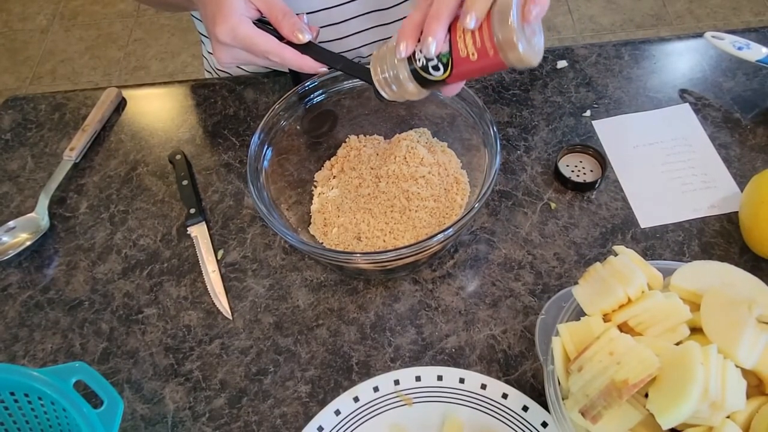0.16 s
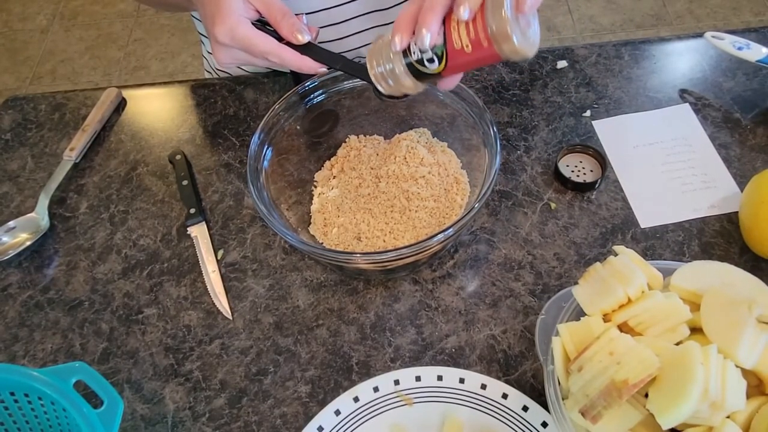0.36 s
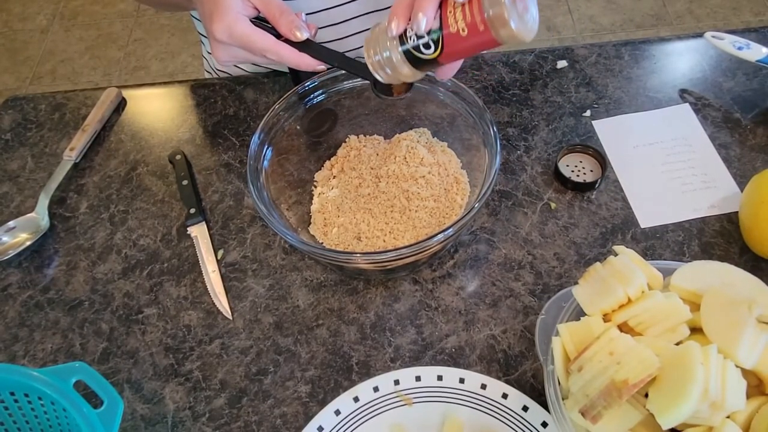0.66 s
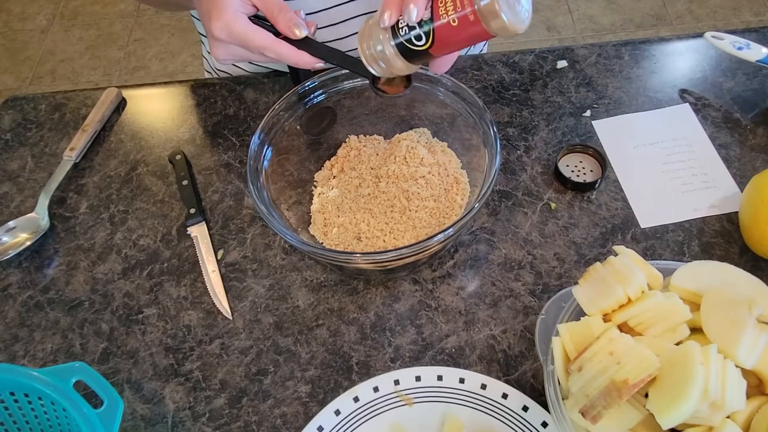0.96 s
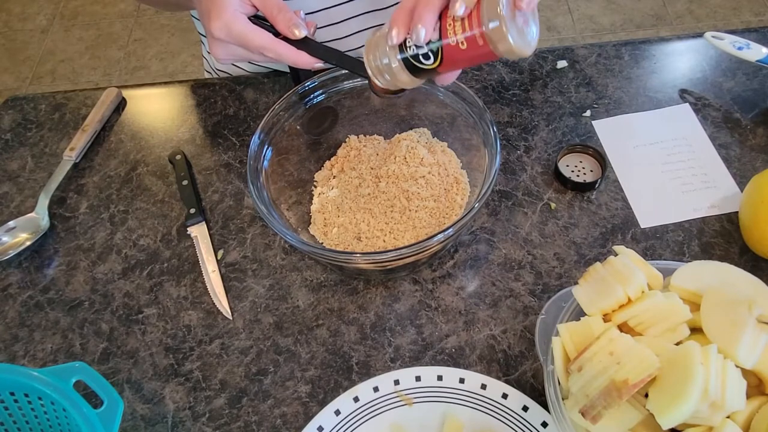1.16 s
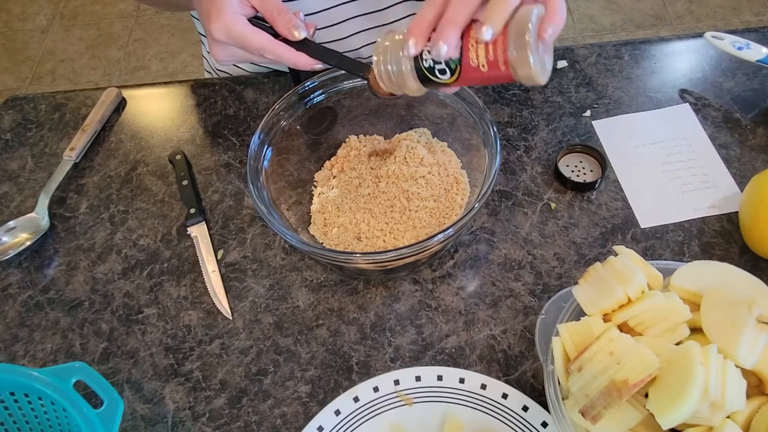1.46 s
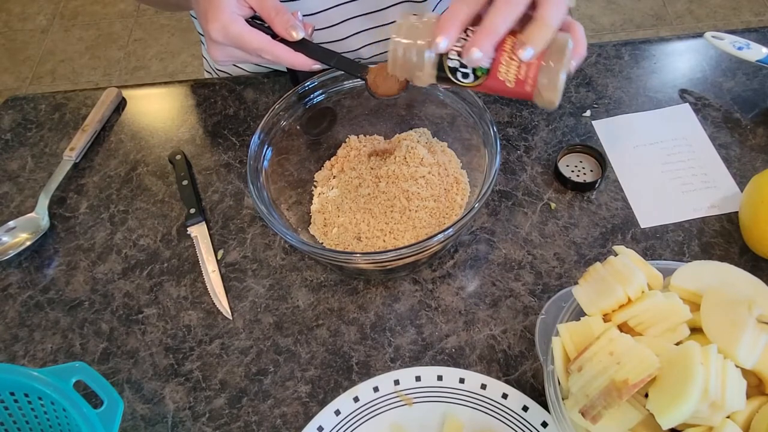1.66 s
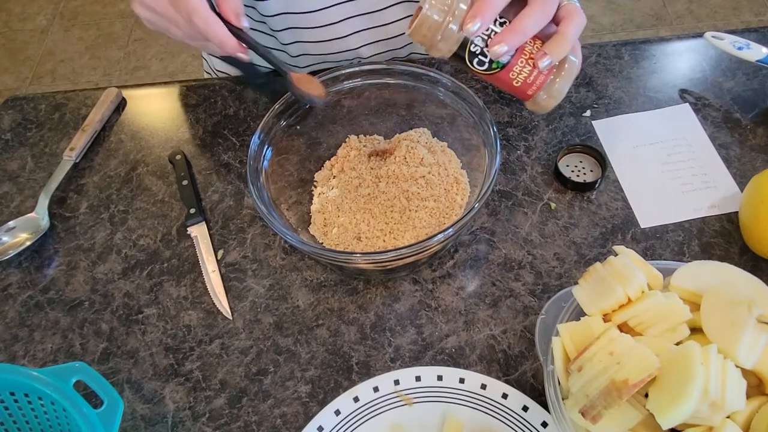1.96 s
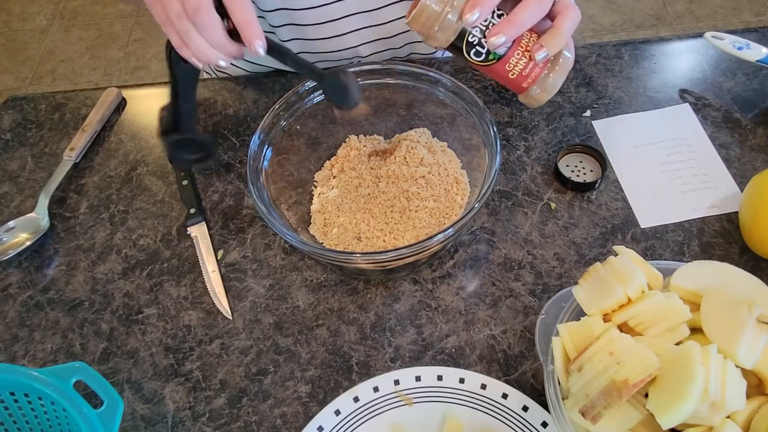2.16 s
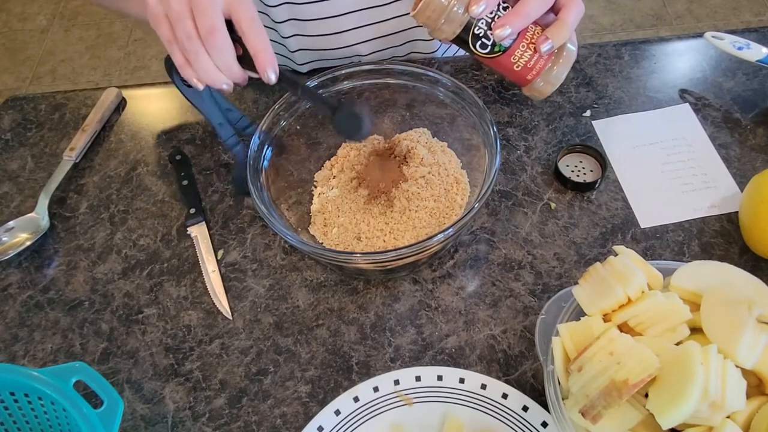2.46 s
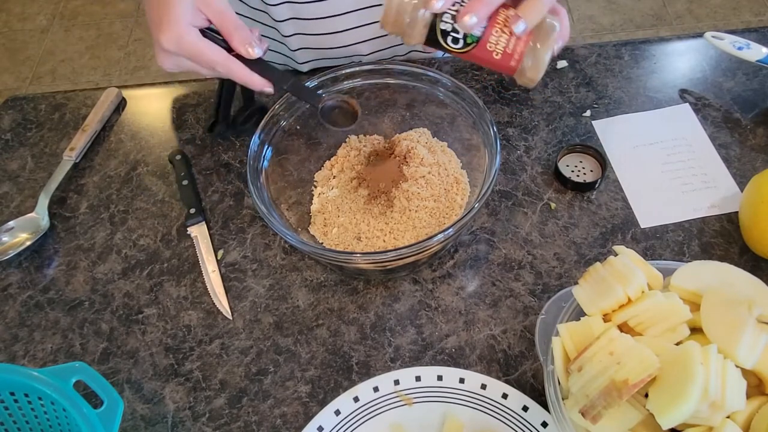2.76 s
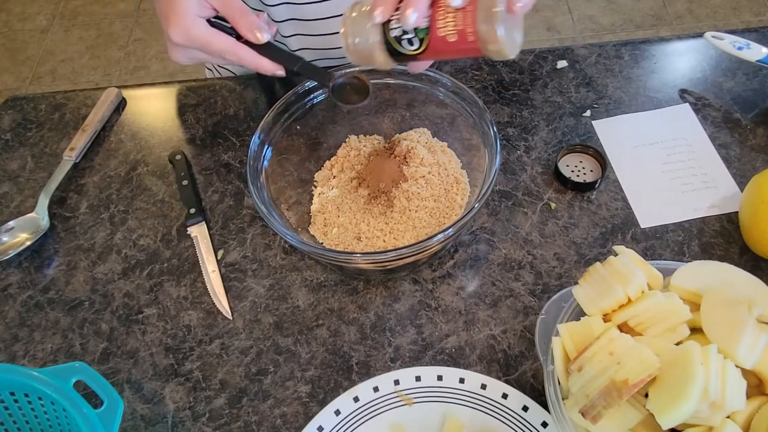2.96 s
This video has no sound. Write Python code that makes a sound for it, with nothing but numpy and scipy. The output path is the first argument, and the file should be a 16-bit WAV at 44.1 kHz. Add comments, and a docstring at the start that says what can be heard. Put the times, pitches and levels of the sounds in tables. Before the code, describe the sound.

Small hollow spoon taps on a spice jar come first, then near quiet, a sharp plastic click, one hard glass bowl clink with a short ring, and faint rattles; close pickup, low refrigerator hum.

```python
"""A plastic measuring spoon taps and scrapes in the neck of a spice jar, close to a pair of microphones.
Soft contacts ring short jar modes and the air inside; its fellow spoons click on their ring as runs of slips.
One spoon strikes a glass bowl on a stone counter: a knock, a crack, dull thumps and long dying glass modes.
The quiet kitchen adds early echoes and a scattered tail, over shaped-noise room tone and the wavering
lines of a humming refrigerator."""
import sys
import numpy as np
from scipy import signal
from scipy.fft import rfft, irfft
from scipy.io import wavfile
from scipy.ndimage import uniform_filter1d

SR = 44100
rng = np.random.default_rng(int(sys.argv[2]) if len(sys.argv) > 2 else 0)


def store_wav(level_fs):
    """Save 16-bit WAV to argv[1]."""
    pcm = np.round(np.clip(np.atleast_2d(level_fs), -1, 1) * 32767)
    wavfile.write(sys.argv[1], SR, pcm.T.astype(np.int16))


N = 136710  # samples

# Room tone spectrum: (frequency [Hz], relative density [dB per Hz])
AIR_SPECTRUM = [(25, -29), (45, -19), (60, -11.5), (110, -17), (150, -28), (240, -14), (280, -17),
                (330, -14), (480, -21), (560, -22), (700, -17), (960, -29.5), (1300, -26.5), (2300, -35.5),
                (3000, -31.5), (5000, -39.5), (6800, -35.5), (8200, -46), (9200, -38), (11000, -54.5),
                (14000, -42), (16000, -54.5)]
# Likeness of the two microphones: (frequency [Hz], left-right correlation [-1 to 1])
MIC_LIKENESS = [(60, 0.89), (130, 0.74), (290, 0.67), (640, -0.049), (1410, -0.46), (3100, -0.037),
                (6820, -0.005), (15000, 0.074)]
# Tilt of the background between microphones: (frequency [Hz], left minus right [dB])
BACKGROUND_LEAN = [(80, 7), (200, -1.5), (700, 4), (1500, -0.5), (4400, 2), (9000, -2)]
AIR_RMS_DB, PATCH_DB = -68.5, 1.04

# Refrigerator lines: (frequency [Hz]), one for each row of HUM_LINES
HUM_HZ = [59.5, 237, 251, 306, 474, 667.6, 1305, 3677, 6880]
# Refrigerator lines: (level before the left-right lean [dB rms], width of the wavering part [Hz])
HUM_LINES = [(-76, 0.78), (-79.5, 5.7), (-82.5, 2.3), (-78, 2.9), (-85, 2.5), (-75.5, 4.3), (-88, 14),
             (-99, 25), (-98.5, 33)]
HUM_STEADY = 0.85  # amplitude share of the steady part

# Spoon on the jar neck: (time [s], level [dB], air note [Hz], air note level [dB],
# upper mode level [dB], treble slope [dB per octave])
JAR_TAPS = [(0.1222, -40, 926, -6, -12, -9), (0.2669, -30.5, 1110, -23, -2.5, 2.5),
            (0.464, -43, 936, -4, -1.5, -6.5), (0.6365, -39.5, 1290, -6.5, -8.5, 5),
            (0.8018, -41.5, 823, -7, -1.5, -12), (0.9605, -34.5, 1237, -9, -13.5, -13)]
# Modes of the jar: (frequency [Hz], level [dB])
JAR_MODES = [(580, -12.5), (1790, -1.5), (2700, 1.5), (3200, 7), (4050, -0.5), (5250, 1.5), (7000, -7)]
# Spoon rubbing along the neck: (start [s], length [s], level [dB], upper mode level [dB])
JAR_RUBS = [(0.272, 0.066, -52.5, -11.5)]
# Upper modes lie above the middle; the treble slope starts at the high frequency
JAR_MID_HZ, JAR_HIGH_HZ = 1790, 3300
JAR_SPREAD, JAR_SPREAD_DB = .04, 2.5  # chance in mode pitch (as a share) and in mode level
JAR_T60_S, JAR_RISE_S = .014, .0008
CONTACT_SAMPLES = 7
TICK_DB, TICK_T60_S = -7.5, 0.0065
RUB_SLIPS_PER_S, RUB_RISE, RUB_GRIT = 830, 0.62, 0.054  # rise: share of the length
RUB_AIR_HZ, RUB_AIR_DB = 1040, -16

# Loose spoons clicking and brushing: (time [s], length [s], level [dB], pitch [Hz], half width [Hz])
SPOON_CLICKS = [(1.37, 0.074, -71, 2400, 470), (2.333, 0.000071, -20, 3880, 248),
                (2.3306, 0.00028, -31.5, 6370, 403), (2.3752, 0.00012, -33, 3900, 295),
                (2.337, 0.12, -59.5, 4050, 310), (2.873, 0.003, -53, 6200, 920),
                (2.8977, 0.000079, -35.5, 3500, 1196), (2.9, 0.03, -61.5, 2550, 410),
                (2.912, 0.15, -65.5, 3640, 590), (2.959, 0.026, -59.5, 6000, 500),
                (2.9675, 0.00011, -35, 5850, 603), (2.979, 0.000089, -34, 5800, 510),
                (2.967, 0.061, -63, 5780, 510)]
CLICK_RISE = 0.053  # share of the length

# Thumps through the counter: (time [s], starting level [dB], frequency [Hz], t60 [s])
COUNTER_THUMPS = [(2.356, -53.5, 92, 0.11), (2.559, -52.5, 189.6, 0.16)]
# The striking spoon: (frequency [Hz], level [dB], t60 [s])
SPOON_MODES = [(2686, -15, 0.0068), (2015, -27.5, 0.0099), (6010, -37, 0.066)]
# Spectrum of the crack: (frequency [Hz], relative level [dB])
CRACK_SPECTRUM = [(100, -23.5), (250, -7), (700, -14.5), (1500, -13.5), (2600, -10.5), (5500, -13.5),
                  (9000, -20.5), (16000, -30)]
CRACK_DB, CRACK_T60_S = -25.5, 0.033
STRIKE_S, STRIKE_RISE_S = 2.5584, 0.00073

# Glass bowl modes: (frequency [Hz]), one for each row of BOWL_MODES
BOWL_HZ = [571, 583, 1335, 1336, 2355, 2356, 3620, 5158, 6908, 7918, 8875, 10000]
# Glass bowl modes: (level [dB], t60 [s], left minus right [dB], left phase lead [radians])
BOWL_MODES = [(-40, .36, 2, -1), (-44, .55, 2, 0), (-33, .36, 9, 2.2), (-39, .66, -8, 2.3),
              (-29, .27, 8, .2), (-44, .5, 3, .2), (-52, .13, 2, 1), (-42, .34, 4, .5), (-51, .15, 0, 1),
              (-52, .18, 2, 1), (-52, .15, -2, -1), (-60, .15, 0, 1)]
BOWL_SWELL_S = 0.00077

# First echoes: (delay [s], left level [dB], right level [dB])
EARLY_ECHOES = [(.0011, -4, -3), (.0056, -9, -9), (.0088, -20, -18)]
LEFT_DB, RIGHT_DB, RIGHT_LAG_S = 1.5, -1.5, .0001  # direct sound
# Dying of the kitchen tail: (frequency [Hz], t60 [s])
KITCHEN_T60 = [(150, 0.34), (500, 0.37), (1500, 0.5), (4000, 0.32), (8000, 0.37), (14000, 0.08)]
TAIL_START_S, TAIL_TURNS_PER_S = .004, 2.3
JAR_WET_DB, STRIKE_WET_DB, BOWL_WET_DB = -11, 1.5, -13  # sent to the tail

MIC_LOW_HZ, MIC_HIGH_HZ = 44.7, 16100


def amp(db):
    """Decibels to amplitude."""
    return 10 ** (np.asarray(db) / 20)


def evened(x):
    """The sound brought to an rms of one."""
    return x / np.sqrt(np.mean(x ** 2) + 1e-20)


def read(points, hz):
    """A table value at any frequency, drawn straight between points on a log frequency scale."""
    f, value = np.transpose(points)
    return np.interp(np.log(hz + 1), np.log(f + 1), value)


def add(mix, s, sound):
    """Lay a sound into the mix from time s, cut at the end of the mix."""
    part = mix[..., round(s * SR):][..., :sound.shape[-1]]
    part += sound[..., :part.shape[-1]]


def ring(modes, seconds):
    """Sum of dying sines, one for each (Hz, dB, t60)."""
    t = np.arange(0, seconds, 1 / SR)
    return sum(amp(db - 60 * t / t60) * np.sin(2 * np.pi * hz * t) for hz, db, t60 in modes)


def slips(s, length, rise, size):
    """A short run of uneven contacts that swells and dies away; rise is a share of the length."""
    length = max(length, .0001)
    u = np.arange(0, length, 1 / SR) / length
    contacts = evened(size[round(s * SR):][:len(u)])
    return contacts * np.minimum(u / rise, 1) * (1 - u)


def room_tone():
    """Steady stereo noise with faint drifting patches, partly alike at the two microphones."""
    frames, hz = N // 512 + 5, np.fft.rfftfreq(2048, 1 / SR)
    a, b, c, d, patches = rng.standard_normal((frames, 1025, 5)).T
    # smoothed over neighbouring frequencies and frames
    patches = evened(uniform_filter1d(uniform_filter1d(patches, 14, 0), 10, 1))
    same = np.clip(read(MIC_LIKENESS, hz), -1, 1)[:, None]
    left = a + 1j * b
    right = same * left + np.sqrt(1 - same ** 2) * (c + 1j * d)
    lean_db = np.array([.5, -.5])[:, None, None] * read(BACKGROUND_LEAN, hz)[:, None]
    level_db = read(AIR_SPECTRUM, hz)[:, None] + lean_db + PATCH_DB * patches
    spectrum = np.array([left, right]) * amp(level_db)
    noise = signal.istft(spectrum, nperseg=2048, noverlap=1536)[1][:, :N]
    return amp(AIR_RMS_DB) * evened(noise)


def refrigerator():
    """Motor lines, part steady and part wavering, phased apart by the microphones' likeness."""
    t, out = np.arange(N) / SR, np.zeros((2, N))
    for hz, (db, width_hz) in zip(HUM_HZ, HUM_LINES):
        # wavering: complex noise through a one-pole lowpass
        r = np.exp(-np.pi * width_hz / SR)
        noise = rng.standard_normal((2, N, 2)) @ [1, 1j]
        waver = signal.lfilter([1], [1, -r], noise) * np.sqrt((1 - r * r) / 2)
        motion = HUM_STEADY + np.sqrt(1 - HUM_STEADY ** 2) * waver
        lead = np.arccos(np.clip(read(MIC_LIKENESS, hz), -1, 1))  # the right leads
        turn = np.exp(2j * np.pi * hz * t + 1j * lead * np.array([[0], [1]]))
        lean = amp(np.array([[.5], [-.5]]) * read(BACKGROUND_LEAN, hz))
        out += amp(db) * np.sqrt(2) * lean * (motion * turn).real
    return out


def jar(air_hz, air_db, upper_db, tilt_db, chance):
    """The jar's short ring and the note of the air inside it; high modes die sooner."""
    modes = [(air_hz, air_db, JAR_T60_S)]
    for (hz, db), (pitch_chance, level_chance) in zip(JAR_MODES, chance):
        level_db = db + JAR_SPREAD_DB * level_chance + upper_db * (hz > JAR_MID_HZ)
        level_db += tilt_db * max(np.log2(hz / JAR_HIGH_HZ), 0)
        t60 = JAR_T60_S * np.sqrt(JAR_MID_HZ / max(hz, JAR_MID_HZ))
        modes.append((hz * (1 + JAR_SPREAD * pitch_chance), level_db, t60))
    sound = ring(modes, .04)
    return sound * np.minimum(np.arange(len(sound)) / SR / JAR_RISE_S, 1)


def spoon_in_jar():
    """Taps of one soft contact with a thin bright tick, and a rub of many small slips ringing the jar."""
    out, size = np.zeros(N), rng.standard_normal(N)
    # faint grit with sparse larger slips
    rubbing = size * (RUB_GRIT + (rng.random(N) < RUB_SLIPS_PER_S / SR))
    chances = rng.uniform(-1.36, 1, (len(JAR_TAPS), len(JAR_MODES), 2))
    for (s, db, air_hz, air_db, upper_db, tilt_db), chance in zip(JAR_TAPS, chances):
        body = jar(air_hz, air_db, upper_db, tilt_db, chance)
        knock = np.convolve(np.hanning(CONTACT_SAMPLES), body)
        bright = np.diff(size[round(s * SR):][:len(knock) + 1])
        grit = np.convolve(bright, np.hanning(5), "same")
        tick = grit * amp(TICK_DB + upper_db - 60 * np.arange(len(knock)) / SR / TICK_T60_S)
        add(out, s, amp(db) * (knock + tick) / abs(knock).max())
    for s, length, db, upper_db in JAR_RUBS:
        body = jar(RUB_AIR_HZ, RUB_AIR_DB, upper_db, 0, np.zeros((len(JAR_MODES), 2)))
        run = slips(s, length, RUB_RISE, rubbing)
        add(out, s, amp(db) * np.convolve(run, body / np.linalg.norm(body)))
    return out


def loose_spoons():
    """Each click or brush is a run of slips through one broad plastic ring."""
    out = np.zeros(N)
    sizes = rng.standard_normal((len(SPOON_CLICKS), SR // 5))
    for (s, length, db, hz, half_width_hz), size in zip(SPOON_CLICKS, sizes):
        t60 = np.log(1000) / np.pi / half_width_hz / 2
        body = ring([(hz, 0, t60)], .03)
        body = np.convolve(body, body)  # rung twice: a steeper resonance
        run = slips(0, length, CLICK_RISE, size * abs(size))
        add(out, s, amp(db) * np.convolve(run, body / np.linalg.norm(body)))
    return out


def strike():
    """The spoon's own knock, a burst of shaped noise for the crack, and dull thumps in the counter."""
    out, t = np.zeros(N), np.arange(8192) / SR
    colour = amp(read(CRACK_SPECTRUM, np.fft.rfftfreq(len(t), 1 / SR)))
    noise = irfft(rfft(rng.standard_normal(len(t))) * colour)
    crack = evened(noise) * amp(CRACK_DB - 60 * t / CRACK_T60_S)
    blow = ring(SPOON_MODES, .2)[:len(t)] + crack
    add(out, STRIKE_S, blow * np.minimum(t / STRIKE_RISE_S, 1))
    for s, db, hz, t60 in COUNTER_THUMPS:
        thump = ring([(hz, db, t60)], .3)
        rise = np.minimum(np.arange(len(thump)) / SR * hz, 1)  # over one cycle
        add(out, s, thump * rise)
    return out


def bowl():
    """Dying glass modes, each reaching the two microphones at its own level and phase."""
    out, t = np.zeros((2, N)), np.arange(N - round(STRIKE_S * SR)) / SR
    side = np.array([[.5], [-.5]])
    glass = 0
    for hz, (db, t60, pan_db, lead) in zip(BOWL_HZ, BOWL_MODES):
        level = amp(db + side * pan_db - 60 * t / t60)
        glass = glass + level * np.sin(2 * np.pi * hz * t + side * lead)
    add(out, STRIKE_S, (1 - np.exp(-t / BOWL_SWELL_S)) * glass)
    return out


def near(x):
    """Direct sound at both microphones and the first echoes from counter, bowl and cupboards."""
    taps = np.zeros((2, SR // 10))
    taps[0, 0], taps[1, round(RIGHT_LAG_S * SR)] = amp(LEFT_DB), amp(RIGHT_DB)
    jitters = rng.integers(0, 4, (len(EARLY_ECHOES), 2))  # samples
    for (s, left_db, right_db), jitter in zip(EARLY_ECHOES, jitters):
        taps[[0, 1], round(s * SR) + jitter] += amp([left_db, right_db])
    return signal.fftconvolve(x[None], taps, axes=1)[:, :N]


def kitchen(x):
    """Three tails of sparse taps, bands dying at their own speeds; hits drift from one tail to the next."""
    taps, grid = np.zeros((3, 2, SR)), np.arange(round(TAIL_START_S * SR), SR - 20, 20)
    at = grid + rng.integers(0, 20, (3, 2, SR // 20))[..., :len(grid)]
    signs = rng.choice([-1., 1.], (3, 2, SR // 20))[..., :len(grid)]
    np.put_along_axis(taps, at, signs, 2)
    hz, t, z = signal.stft(taps, SR, nperseg=256)
    dying = amp(-60 * t / read(KITCHEN_T60, hz)[:, None])
    tail = signal.istft(z * dying, SR, nperseg=256)[1]
    turns = TAIL_TURNS_PER_S * np.arange(N) / SR + np.arange(3)[:, None] / 3
    share = np.sqrt(2 / 3) * np.cos(2 * np.pi * turns)
    tail = tail / np.linalg.norm(tail[0, 0])
    return signal.fftconvolve((share * x)[:, None], tail, axes=2).sum(0)[:, :N]


def scene():
    """Spoons, strike and bowl close by, with the kitchen's tail, room tone and refrigerator behind them."""
    spoons = spoon_in_jar() + loose_spoons()
    hits, glass = strike(), bowl()
    sent = amp(JAR_WET_DB) * spoons + amp(STRIKE_WET_DB) * hits + amp(BOWL_WET_DB) * glass[0]
    tail = kitchen(sent)
    return near(spoons + hits) + glass + tail + room_tone() + refrigerator()


def record(dry):
    """The microphones lose the deepest bass; then a steep filter limits the treble."""
    bass_cut = signal.butter(2, MIC_LOW_HZ, "high", fs=SR, output="sos")
    heard = signal.sosfilt(bass_cut, dry)
    treble_cut = signal.firwin(511, MIC_HIGH_HZ, window=("kaiser", 9), fs=SR)
    return signal.oaconvolve(heard, treble_cut[None], "same")


dry = scene()
out = record(dry)
store_wav(out)
```